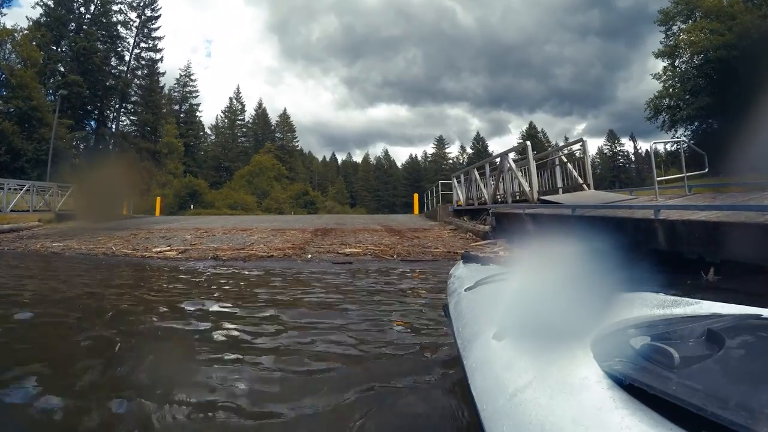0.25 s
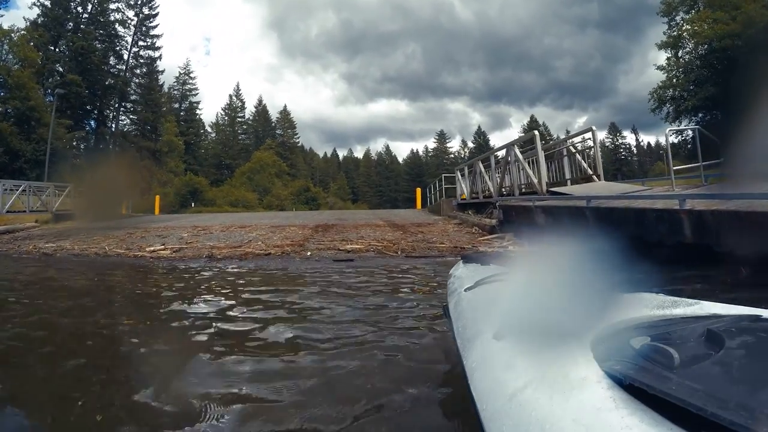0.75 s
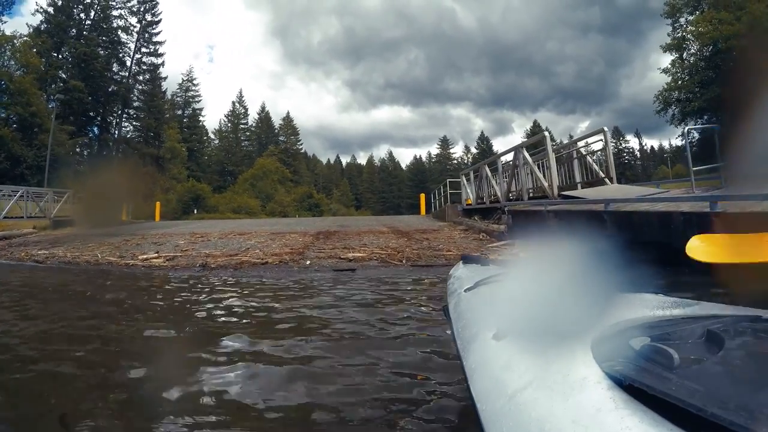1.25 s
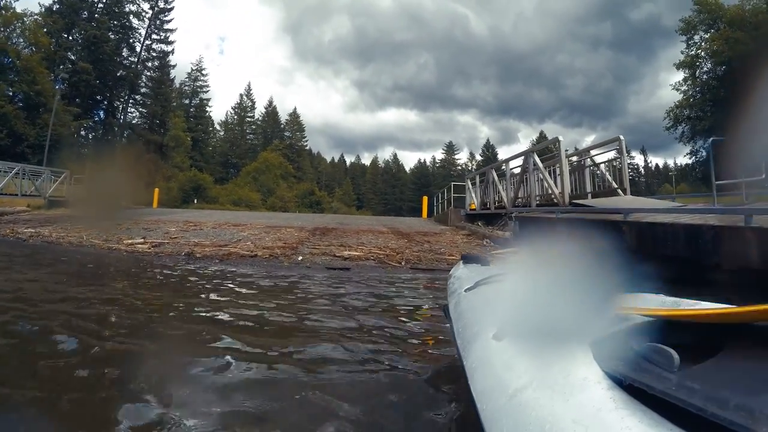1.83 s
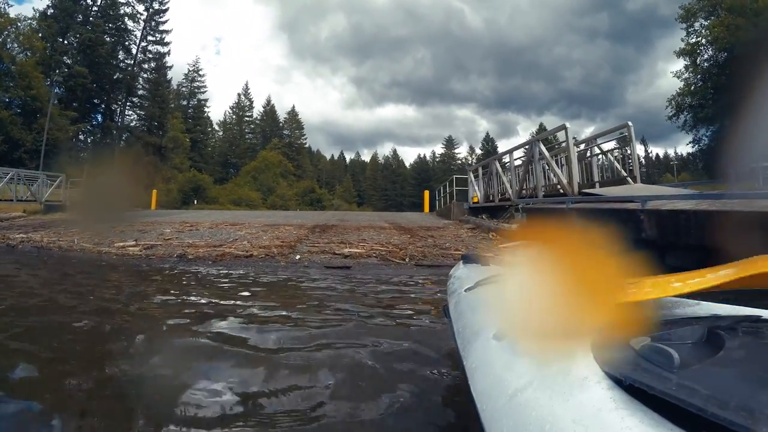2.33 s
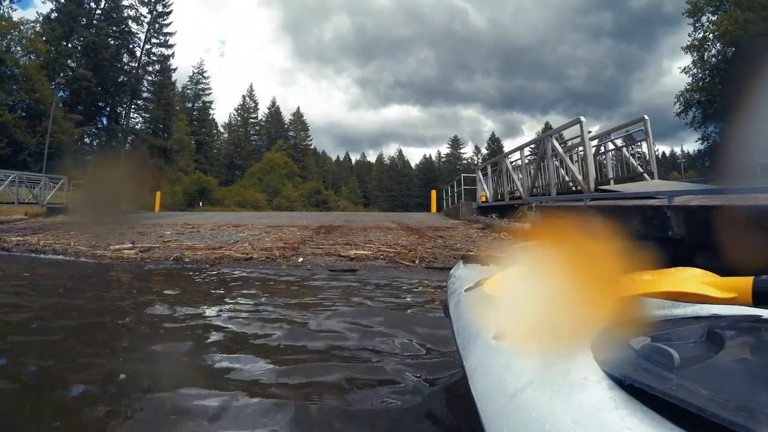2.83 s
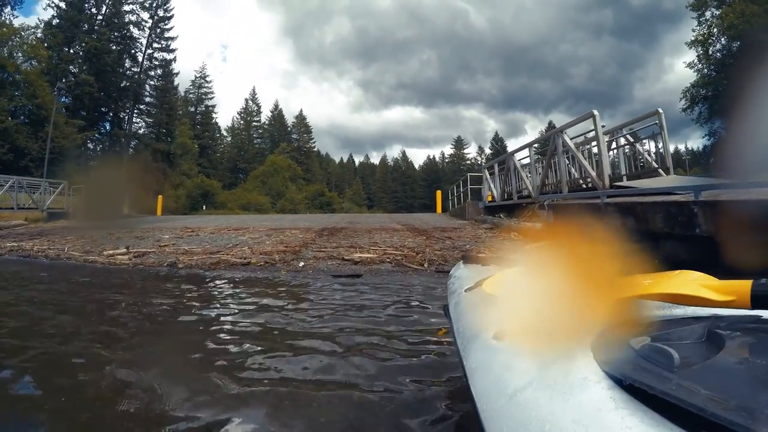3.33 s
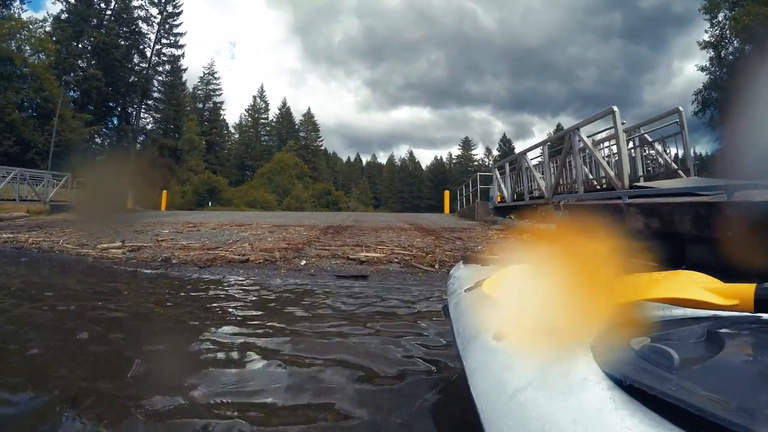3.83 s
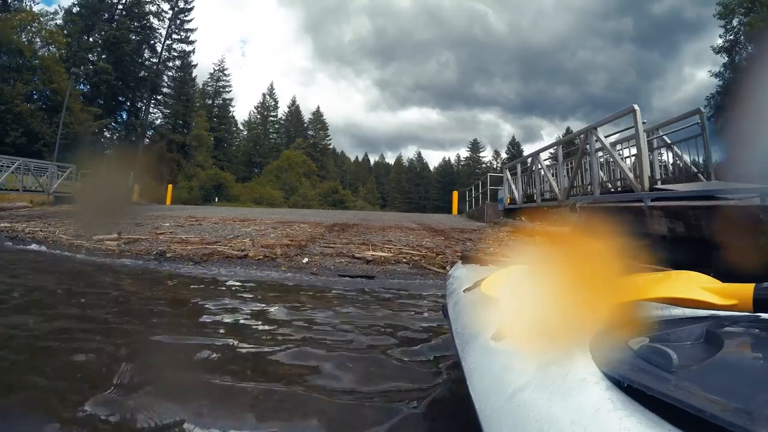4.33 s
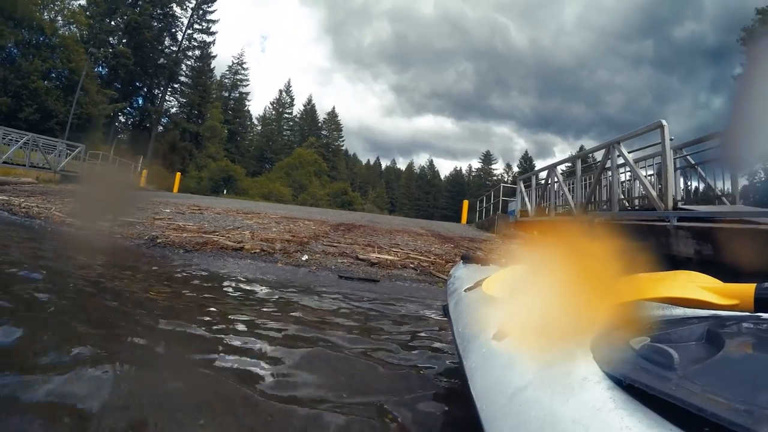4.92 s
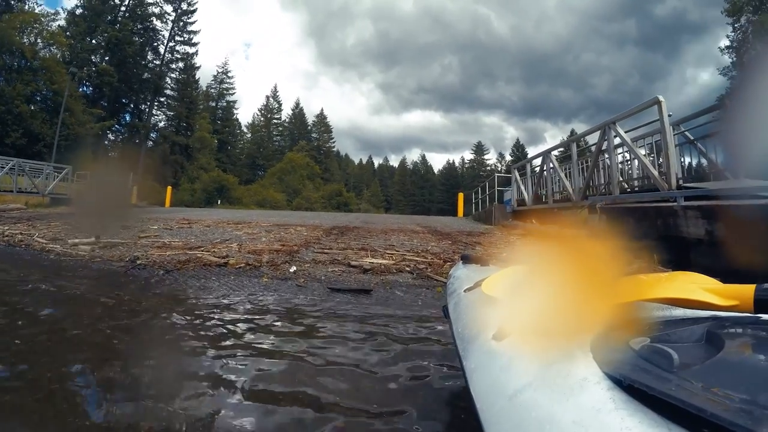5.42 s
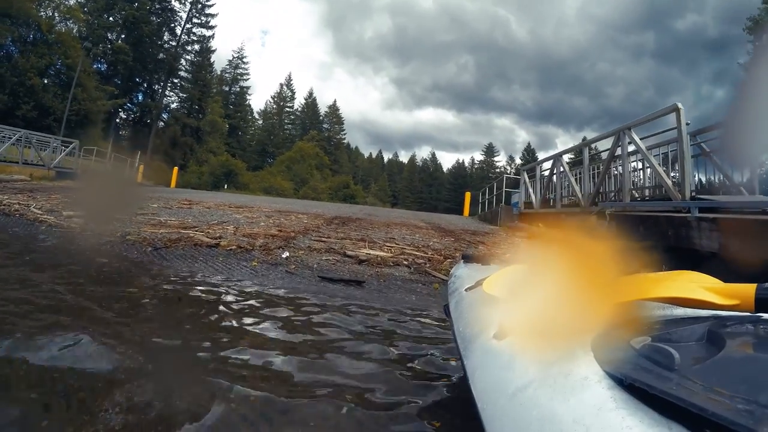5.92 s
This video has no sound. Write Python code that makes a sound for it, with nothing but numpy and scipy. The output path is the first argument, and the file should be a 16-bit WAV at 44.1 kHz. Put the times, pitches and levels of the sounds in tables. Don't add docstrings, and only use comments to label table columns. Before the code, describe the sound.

A paddle knocks about on a drifting kayak by a lake shore. Close, boxy contact sound, dull on top: irregular thumps with short woody rattles, a deep rumbling flex of the shell, wavelets sloshing and gurgling along the outside. Near the end the knocks fade and a scatter of small drops and fine bubbles comes forward over faint outdoor hush.

```python
import sys
import numpy as np
from scipy import signal
from scipy.fft import rfft, irfft, next_fast_len
from scipy.io import wavfile
from scipy.ndimage import uniform_filter1d, minimum_filter1d, map_coordinates

SR = 44100
rng = np.random.default_rng(int(sys.argv[2]) if len(sys.argv) > 2 else 0)


def pcm_store(signal):
    levels = np.round(np.clip(np.atleast_2d(signal), -1, 1) * 32767)
    wavfile.write(sys.argv[1], SR, levels.astype(np.int16).T)


def level_to_linear(level):
    exponent = np.asarray(level, float) / 20
    return 10 ** exponent


N = 272361

# time in seconds, slosh in dB, gurgle in dB, fizz in dB.
WATER = [(0.0, -68.9, -73, -70), (0.18, -53.5, -74, -73), (0.48, -66.5, -74.5, -72),
         (0.78, -38, -61.5, -68), (0.81, -38, -60, -76.5), (0.84, -44, -47.5, -66),
         (0.99, -47, -71.5, -70.5), (1.11, -42.5, -59.5, -64.5), (1.42, -60, -69, -71.5),
         (1.48, -58, -67, -72.5), (1.49, -54, -61, -64), (1.5, -37.5, -35, -65.5), (1.52, -44, -46, -64.2),
         (1.59, -15.5, -49, -63), (1.79, -35.5, -67, -68.5), (1.86, -25.5, -50, -66),
         (1.9, -30, -48.5, -67.5), (2.08, -35.5, -56.5, -70), (2.19, -25.5, -41.5, -72),
         (2.26, -26, -56, -66), (2.3, -35, -53.5, -71.5), (2.41, -35, -55.5, -64.5),
         (2.61, -40, -45.5, -66), (2.63, -26, -41, -66.5), (2.68, -27.5, -64, -61.5),
         (2.76, -54.5, -48, -61), (2.93, -45.5, -52, -62), (3.04, -30, -48, -65.5), (3.31, -39, -62, -68.5),
         (3.49, -59, -70.5, -67), (3.55, -54.5, -62, -73), (3.65, -55.5, -51.5, -70.5),
         (3.67, -30, -52.5, -73), (3.68, -27, -36, -65.5), (3.7, -21.2, -50, -66),
         (3.74, -13.5, -35.5, -66.5), (3.84, -35, -49.5, -68), (4.05, -50.5, -65, -66.5),
         (4.31, -51, -56.5, -62.5), (4.34, -36.9, -55, -71), (4.4, -42, -56, -63), (4.44, -29, -42, -71),
         (4.54, -13.5, -41.5, -63), (4.6, -35, -55.5, -59.5), (4.74, -53, -54, -66.5),
         (4.96, -44, -48, -70), (5.09, -46, -50, -71), (5.12, -30, -52.5, -72), (5.3, -51.5, -64, -69),
         (5.46, -42, -52, -72), (5.52, -48, -49.5, -66), (5.55, -21, -39.5, -53), (5.57, -30, -41.5, -49.5),
         (5.64, -35, -47.5, -59.5), (5.79, -51, -50.5, -59), (5.91, -60.5, -60, -62.5),
         (6.06, -36.5, -56, -66), (6.18, -53, -49.5, -62.5)]
# pitch in Hz, level in dB, 60 dB decay in seconds.
PANEL_MODES = [(60.8, -12.5, 0.17), (80.3, -3, 0.21), (110.4, -5, 0.2), (159.7, 0.5, .13),
               (183.3, -1, 0.096), (232.2, 1.5, 0.095), (300.7, -1.14, 0.067), (399.6, -4.5, 0.054)]
# centre in Hz, width in Hz, level in dB.
WALL_MODES = [(445, 99, 3), (648, 119, 5), (781, 174, 3.5), (1012, 125, 2), (1133, 153, 1.5),
              (1307.3, 248, -3.5), (1708, 134, -7), (1849, 69, -9.5), (2020, 91, -12)]
# frequency in Hz, level in dB per Hz.
FIZZ_COLOUR = [(1200, -27.5), (2300, 8.5), (3200, -1), (4700, 1), (6000, -4.5), (7200, -13.5), (10000, -21),
               (16000, -22)]
# centre in Hz, width in Hz, level in dB.
HOUSING_MODES = [(2800, 840, 2), (3320, 260, -0.5), (4880, 440, -2.5), (7240, 900, 10), (9400, 1700, 5)]


def unit(x):
    return x / np.sqrt(np.mean(x ** 2) + 1e-20)


def crest(x, size):
    loudest = uniform_filter1d(x ** 2, size).max(axis=-1, keepdims=True)
    return x / np.sqrt(loudest + 1e-20)


def along(points, hz):
    f, v = np.transpose(points)
    return np.interp(np.log(hz + 1), np.log(f + 1), v)


def curves(rows):
    s, *columns = np.transpose(rows)
    t = np.arange(N) / SR
    return [np.interp(t, s, column) for column in columns]


def wobble(rate):
    knots = rng.standard_normal(int(N * rate / SR) + 4)
    return map_coordinates(knots, [np.arange(N) * rate / SR])


def noise(events, t):
    return rng.standard_normal((len(events), len(t)))


def patchy(depth_db):
    z = signal.stft(rng.standard_normal(N), nperseg=512)[2]
    field = uniform_filter1d(rng.standard_normal(z.shape), size=5, axis=0)
    field = uniform_filter1d(field, size=6, axis=1)
    return signal.istft(z * level_to_linear(depth_db * unit(field)), nperseg=512)[1][:N]


def filtered(x, response):
    count = x.shape[-1]
    m = next_fast_len(count + 4096)
    return irfft(rfft(x, m) * response(np.fft.rfftfreq(m, 1 / SR)), m)[..., :count]


def falling(f, hz):
    return 1 / (1 + 1.1j * f / hz - (f / hz) ** 2)


def resonances(modes, f):
    total = 0
    for k, (centre, width, db) in enumerate(modes):
        band = 1j * f * width / (centre * centre - f * f + 1j * f * width)
        total = total + (-1) ** k * level_to_linear(db) * band
    return total


def wall(f):
    return resonances(WALL_MODES, f) * 1j * f / (300 + 1j * f) * falling(f, hz=2060) ** 4


def housing(f):
    return 1.6 + sum(level_to_linear(db) / (1 + (2 * (f - hz) / width) ** 2) for hz, width, db in HOUSING_MODES)


def add(track, s, x):
    track[round(s * SR):][:len(x)] += x


def placed(times, rows):
    out = np.zeros(N + SR)
    for s, x in zip(times, rows):
        add(out, s, x)
    return out[:N]


def knocks():
    # start in seconds, knock in dB, thump in dB, click in dB, thump centre in Hz,
    # 60 dB decay of the knock in seconds.
    blow_list = [(0.041, -56, -45, -70, 180, 0.056), (0.154, -61, -47, -77, 117, 0.057),
                 (0.661, -49.5, -30.5, -57, 151, 0.062), (0.762, -36.5, -36.5, -66, 158, 0.016),
                 (0.802, -5, -7, -35.5, 189, 0.022), (0.826, -22.6, -14, -48.5, 201, 0.045),
                 (0.865, -37, -24, -69, 144, 0.14), (0.935, -53, -37.5, -64, 102, 0.045),
                 (1.075, -23.5, -22, -50.5, 233, 0.039), (1.476, -28.5, -25.5, -44, 149, 0.12),
                 (1.535, -13.5, -6.5, -36.5, 168, 0.091), (1.571, -29, -26, -54.5, 163, 0.063),
                 (1.621, -10, -4, -35, 219, 0.041), (1.665, -30, -20, -50, 117.4, 0.062),
                 (1.723, -33.5, -23.5, -60, 130.9, 0.073), (1.776, -35, -30, -57, 145, 0.062),
                 (1.841, -39.5, -45, -66, 181, 0.057), (1.853, -9.5, -4, -34.5, 167, 0.062),
                 (1.927, -38, -23, -46, 156, 0.031), (1.955, -18.5, -13, -45, 162, 0.043),
                 (2.056, -25.5, -21.5, -39.5, 168, 0.073), (2.13, -14.5, -19.5, -36.5, 173, 0.023),
                 (2.177, -36.5, -36, -50, 177.8, 0.05), (2.208, -23, -24, -47.5, 165, 0.039),
                 (2.25, -36.5, -26.5, -69, 175, 0.045), (2.507, -41.5, -30, -64, 167.2, 0.042),
                 (2.6, -23, -19.5, -51, 174, 0.062), (2.659, -34, -17.5, -60, 161, 0.061),
                 (2.985, -41.5, -34.5, -67, 184.6, 0.063), (3.036, -34, -26.5, -66, 149, 0.054),
                 (3.147, -66, -21, -68, 198.8, 0.045), (3.165, -37.5, -42.5, -66, 168.4, 0.034),
                 (3.279, -48, -35, -67, 196.6, 0.031), (3.663, -11.5, -5, -42, 202, 0.06),
                 (3.717, -5, -6.5, -33, 231, 0.045), (3.785, -26.5, -24.5, -78, 141, 0.043),
                 (3.911, -44, -36, -72, 111.5, 0.033), (4.31, -41.5, -29, -71, 157, 0.055),
                 (4.393, -22, -4.5, -61, 163.4, 0.11), (4.466, -9.5, -13.5, -39, 171, 0.039),
                 (4.528, -19.5, -14.5, -61, 216, 0.017), (4.558, -18, -22.5, -51, 175, 0.057),
                 (4.649, -31, -38, -62, 132, 0.026), (5.077, -42.0, -19.5, -57.5, 138.3, 0.035),
                 (5.179, -42.5, -25, -64.5, 137, 0.055), (5.529, -42, -28.5, -47, 203, 0.05),
                 (5.803, -38, -35.5, -48.9, 144, 0.033), (5.949, -39.5, -44, -64, 198, 0.04)]
    t = np.arange(11000) / SR
    s, knock_db, thump_db, click_db, centre_hz, t60 = np.transpose(blow_list)[:, :, None]

    fade = level_to_linear(-60 * t / t60) + level_to_linear(-25.5 - 60 * t / (2.9 * t60))
    lumps = level_to_linear(6.2 * unit(uniform_filter1d(noise(s, t), size=130)))
    rattle = crest(filtered(noise(s, t) * fade * lumps, wall), size=120)

    modes = [(hz, db, 3.94 / width) for hz, width, db in WALL_MODES]
    wall_tilt_db = lambda hz: -2.5 * np.log2(hz / 1000)
    ring = struck(s, t, modes, wall_tilt_db, scatter_db=4.5) * (1 - np.exp(-t / 0.0009))
    knock = rattle + level_to_linear(-4.0) * crest(ring, size=120)

    near_db = lambda hz: -9 * np.log2(hz / centre_hz) ** 2
    thump = struck(s, t, PANEL_MODES, near_db, scatter_db=3.5) * (1 - np.exp(-(t / 0.006) ** 2))

    blows = level_to_linear(knock_db) * crest(knock, size=120) + level_to_linear(thump_db) * crest(thump, size=350)
    return placed(s[:, 0], blows + clicks(s, t, click_db, knock_db))


def struck(events, t, modes, gain_db, scatter_db):
    rows = 0
    for hz, db, t60 in modes:
        luck = rng.standard_normal((len(events), 1))
        detune = rng.standard_normal((len(events), 1))
        level = level_to_linear(db + gain_db(hz) + scatter_db * luck - 60 * t / t60)
        rows = rows + level * np.sin(2 * np.pi * hz * (1 + 0.025 * detune) * t)
    return rows


def clicks(s, t, click_db, knock_db):
    # frequency in Hz, level in dB per Hz.
    click_colour = [(1200, -39.5), (2300, -1.5), (3500, -8), (5000, -11.5), (7500, -23), (11000, -27),
                    (16000, -33.5)]
    tilt_db = np.clip(0.9 * (click_db - knock_db + 28), -4, 5)
    colour = lambda f: level_to_linear(along(click_colour, f) + tilt_db * np.log2((f + 1) / 3000)) * housing(f)
    dull = lambda f: colour(f) * falling(f, hz=3280)
    edge = crest(filtered(noise(s, t) * level_to_linear(-60 * t / 0.011), colour), size=40)
    spray = crest(filtered(noise(s, t) * level_to_linear(-60 * t / 0.053), dull), size=200)
    return level_to_linear(click_db) * (edge + level_to_linear(-5) * spray)


def flex():
    # time in seconds, pitch in Hz, level in dB.
    flex_path = [(0.0, 38.0, -43.5), (0.07, 38.7, -40), (0.15, 39.1, -41.5), (0.23, 42, -29.5),
                 (0.41, 40, -39), (0.46, 38.2, -45.5), (0.645, 36.98, -38.5), (0.675, 42.6, -26),
                 (0.89, 39.9, -22.5), (0.94, 40.8, -26.5), (1.04, 38.2, -23.5), (1.14, 38.3, -40.3),
                 (1.19, 39.4, -26.5), (1.3, 41.6, -37.5), (1.35, 41.88, -37), (1.4, 40.7, -36.5),
                 (1.43, 39.4, -40), (1.45, 38, -47), (1.5, 41.6, -23.5), (1.61, 41.64, -20),
                 (1.65, 42.52, -13.3), (1.84, 37.86, -17.5), (2.05, 40, -13.5), (2.23, 37.26, -18.5),
                 (2.27, 37.64, -32), (2.3, 37.08, -22.5), (2.43, 38.5, -24), (2.51, 42.04, -31),
                 (2.65, 38.9, -18), (2.685, 38.4, -10.5), (3.03, 41.1, -18.5), (3.06, 41.8, -7.5),
                 (3.29, 38.1, -21.5), (3.54, 38.95, -21.5), (3.6, 39.17, -27.5), (3.66, 41.05, -29),
                 (3.69, 42.5, -6.5), (3.74, 41.1, -13), (3.78, 41.7, -9.1), (3.85, 40.0, -15.5),
                 (3.96, 40.54, -16), (4.38, 40, -27.5), (4.43, 41.46, -12.5), (4.55, 39.3, -12.5),
                 (4.585, 40.0, -8.5), (4.92, 38.5, -26.5), (4.99, 39.8, -32), (5.02, 39.2, -18),
                 (5.1, 39.45, -18.5), (5.14, 44.7, -29), (5.23, 43, -18.5), (5.27, 41.3, -23.5),
                 (5.31, 40.3, -23), (5.43, 36.2, -35), (5.55, 40.3, -19.5), (5.71, 41.3, -32),
                 (5.83, 41.1, -21.5), (5.93, 38.0, -31.5), (6.05, 41.6, -26), (6.17, 40.9, -33)]
    hz, level_db = curves(flex_path)
    phase = 2 * np.pi * np.cumsum(hz) / SR + 0.15 * wobble(14)
    loose = lambda f: resonances([(38, 60, 0)], f) * falling(f, hz=62.6) ** 3
    heave = unit(filtered(rng.standard_normal(N), loose))
    tone = np.sqrt(2) * np.sin(phase) + level_to_linear(-15) * heave
    return level_to_linear(level_db + 0.6 * wobble(8.3)) * tone


def wash():
    slosh_db, gurgle_db, _ = curves(WATER)
    panels = [(hz, 2.8 / t60, db - 6 * np.log2(hz / 150)) for hz, db, t60 in PANEL_MODES]
    hull = lambda f: resonances(panels, f) * falling(f, hz=306) ** 2
    slosh = unit(filtered(rng.standard_normal(N) * level_to_linear(2.5 * wobble(25)), hull))
    gurgle = unit(filtered(patchy(depth_db=1.8) * level_to_linear(1.6 * wobble(70)), wall))
    return level_to_linear(slosh_db - 2.0) * slosh + level_to_linear(gurgle_db + 1.4) * gurgle


def drops():
    # start in seconds, level in dB, pitch in Hz.
    near_drops = [(1.591, -47, 5850), (1.6345, -36, 2300.0), (1.7194, -47.5, 3110.0), (1.872, -48, 3280),
                  (2.366, -50, 2840), (2.4163, -59, 5240), (2.529, -44.5, 2650), (2.6395, -48.5, 2880),
                  (2.9649, -50.9, 3130), (3.2507, -51.5, 2530), (3.5546, -54, 2800.0), (3.67, -31.5, 2330),
                  (3.683, -45, 2270), (3.726, -31, 2290), (4.2247, -53, 5075), (4.235, -50, 4020),
                  (4.688, -44, 2807), (5.318, -56.5, 2867), (5.509, -48, 9160), (5.528, -46, 6890.0),
                  (5.5658, -47.5, 6880), (5.5737, -42.5, 3290.0), (5.6003, -35, 2800.0),
                  (5.6194, -36.5, 2570), (5.6272, -40, 2400), (5.65, -52.6, 2310.0), (5.679, -53, 4850),
                  (5.6918, -31, 2650), (5.7094, -41, 4800), (5.734, -35, 2750), (5.812, -51.7, 2800.0),
                  (5.8478, -41, 2550), (5.912, -48.5, 2270), (5.9546, -49, 2560), (5.9824, -46, 2760),
                  (6.0474, -58, 2340), (6.0787, -52, 7580)]
    t = np.arange(1200) / SR
    s, db, hz = np.vstack([near_drops, droplets()]).T[:, :, None]
    rising = np.sin(2 * np.pi * hz * t * (1 + 5 * t))
    bubble = rising * level_to_linear(-60 * t / 0.02) * (1 - np.exp(-t / 0.0015))
    near_pitch = lambda f: 1 / (1 + (np.log2((f + 1) / hz) / 0.6) ** 2)
    spray = lambda f: level_to_linear(along(FIZZ_COLOUR, f)) * housing(f) * near_pitch(f)
    splash = filtered(noise(s, t) * level_to_linear(-60 * t / 0.0081), spray)
    return placed(s[:, 0], level_to_linear(db) * crest(bubble + 0.74 * crest(splash, size=40), size=40))


def droplets(count=90):
    fizz_db = curves(WATER)[2]
    odds = np.cumsum(level_to_linear(1.3 * fizz_db))
    when, which, size = rng.random((count, 3)).T
    at = np.searchsorted(odds, when * odds[-1])
    band = (len(HOUSING_MODES) * which ** 2).astype(int)
    hz = np.array(HOUSING_MODES)[band, 0] * (0.94 + 0.13 * size)
    return np.transpose([at / SR, fizz_db[at] + 1.5 + 6 * size, hz])


def fizz():
    # frequency in Hz, level in dB per Hz.
    bright_colour = [(2500, -29), (4500, 0.5), (7000, 3), (11000, -8), (16000, -9.5)]
    fizz_db = curves(WATER)[2] + 2 * wobble(200) + 1.2 * wobble(30)
    colour = lambda f: level_to_linear(along(FIZZ_COLOUR, f)) * housing(f)
    shared = filtered(patchy(depth_db=4), lambda f: colour(f) * falling(f, hz=5500))
    pair = np.array([patchy(depth_db=3), patchy(depth_db=3)])
    own = filtered(pair, lambda f: colour(f) * f / (f + 5000))
    spray_pair = np.array([patchy(depth_db=4.5), patchy(depth_db=1.5)])
    spray = unit(filtered(spray_pair, lambda f: level_to_linear(along(bright_colour, f))))
    spray_db = 1.5 * (fizz_db + 54.5) - 63
    return level_to_linear(fizz_db + 0.5) * unit(shared + own) + level_to_linear(spray_db) * spray


def air():
    # frequency in Hz, level in dB per Hz.
    air_colour = [(40, -11), (120, 13.5), (300, 3.5), (1000, -6.5), (1700, 3.5), (2500, -8.5), (5000, -8.5),
                  (9000, -12.5), (14000, -15), (15500, -25.5)]
    a, b = patchy(depth_db=1.2), patchy(depth_db=1.0)
    turn = lambda f: np.arctan(f / 6000)
    right = filtered(a, lambda f: np.cos(turn(f))) + filtered(b, lambda f: np.sin(turn(f)))
    return level_to_linear(-63.5) * unit(filtered(np.array([a, right]), lambda f: level_to_linear(along(air_colour, f))))


def scene():
    return knocks() + flex() + wash() + drops() + fizz() + air()


def low_pass(x):
    return signal.sosfilt(signal.butter(12, 16290, fs=SR, output="sos"), x)


def record(dry):
    top_hz, lag_s = 15500, 417.7 / 44100
    needed = np.minimum(1, 0.95 / (np.abs(dry) + 1e-9))
    gain = uniform_filter1d(minimum_filter1d(needed, size=180), size=90)
    left, right = filtered(dry * gain, lambda f: f < top_hz)
    late = filtered(right, lambda f: np.exp(-2j * np.pi * f * lag_s))
    lead = round(lag_s * SR)
    late[:lead] = right[lead:0:-1]
    return low_pass(np.array([left, late]))


dry = scene()
out = record(dry)
pcm_store(out)
```